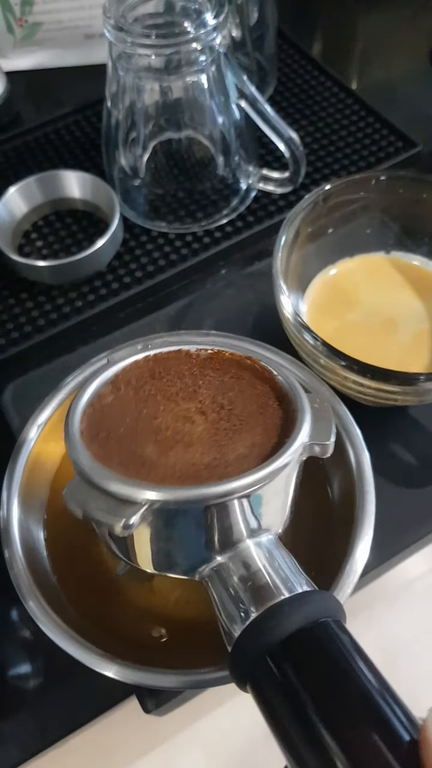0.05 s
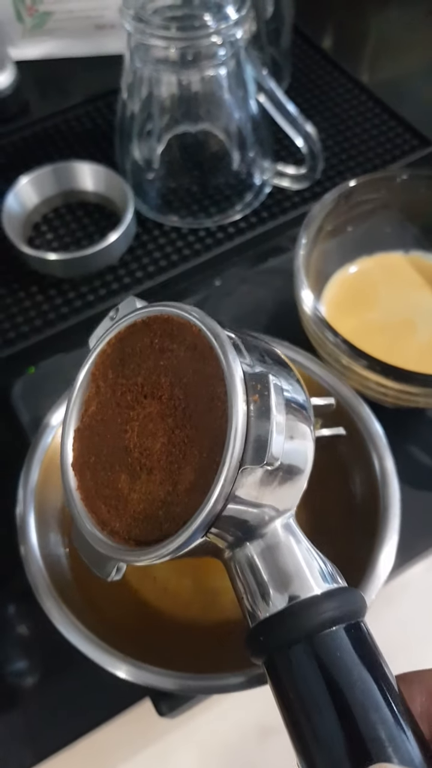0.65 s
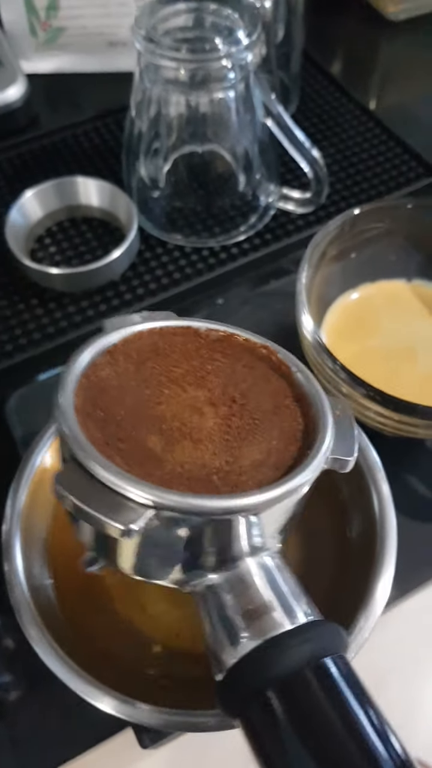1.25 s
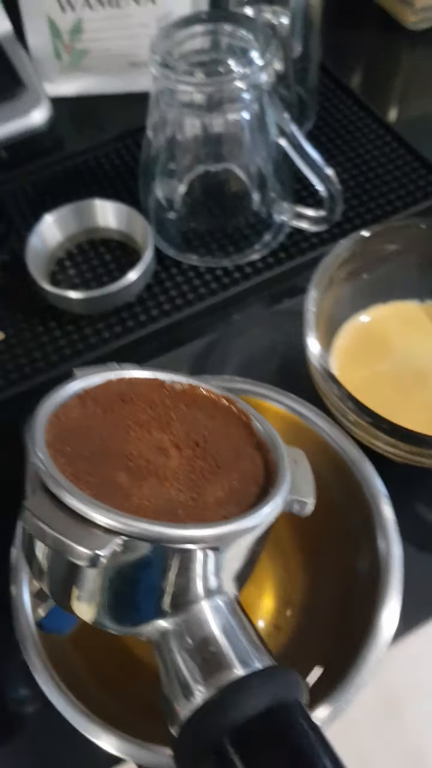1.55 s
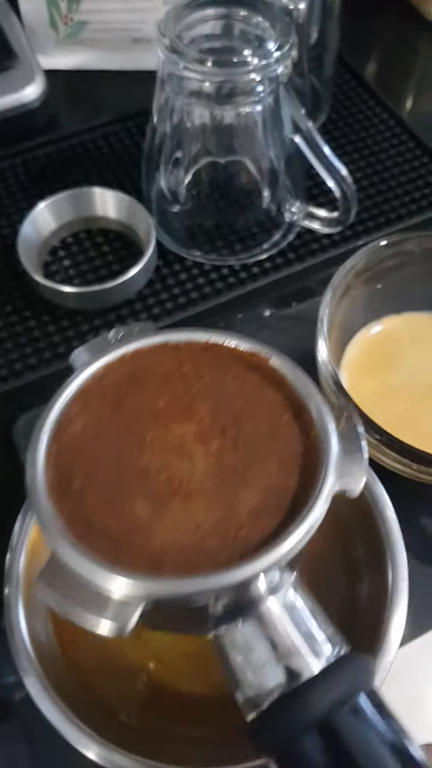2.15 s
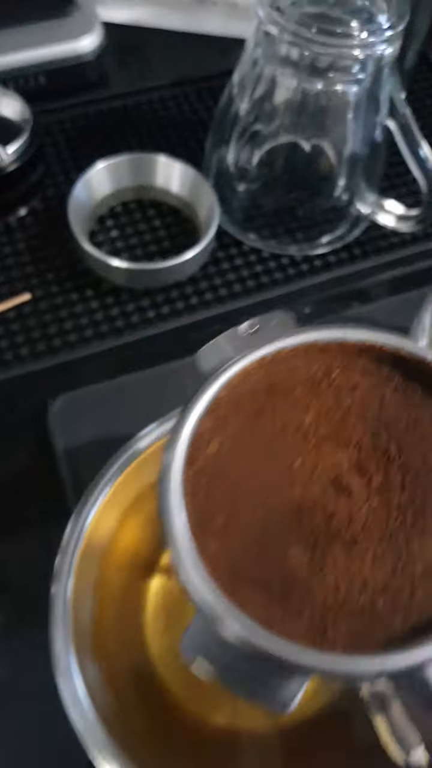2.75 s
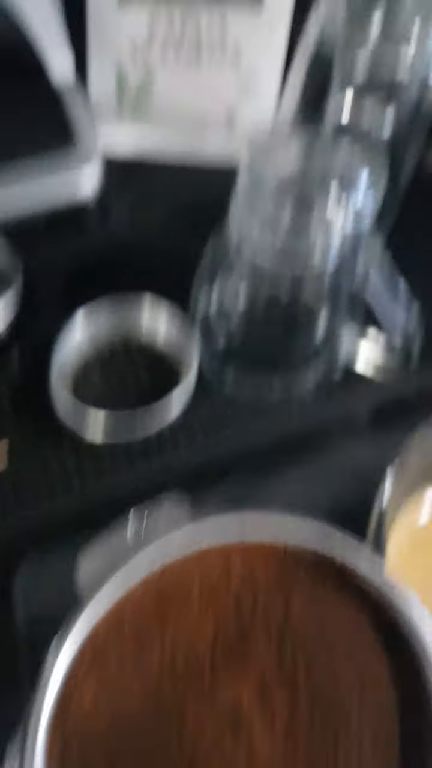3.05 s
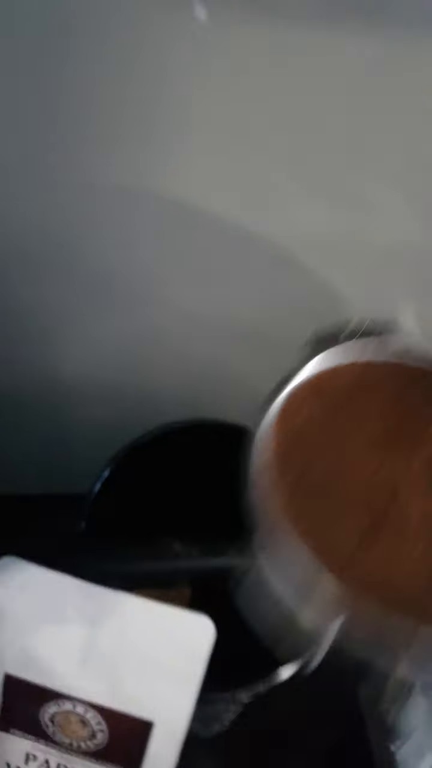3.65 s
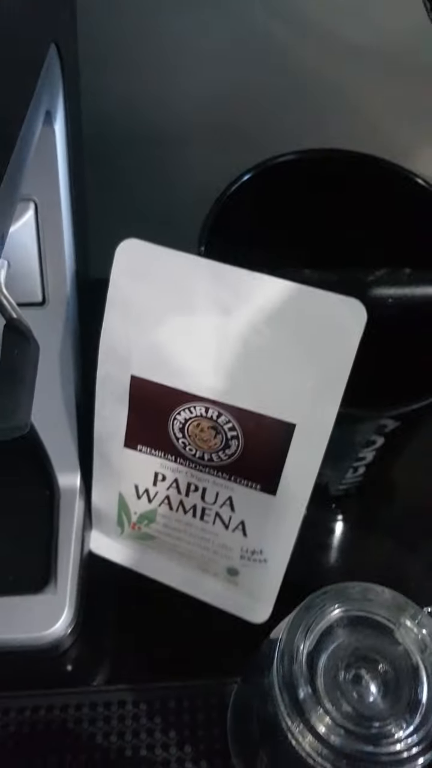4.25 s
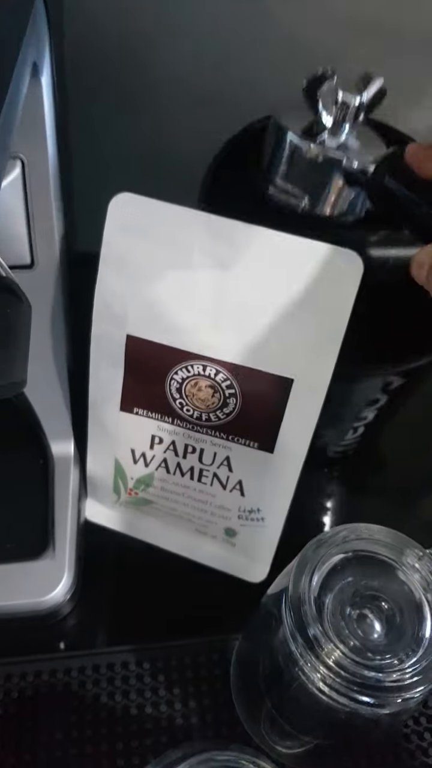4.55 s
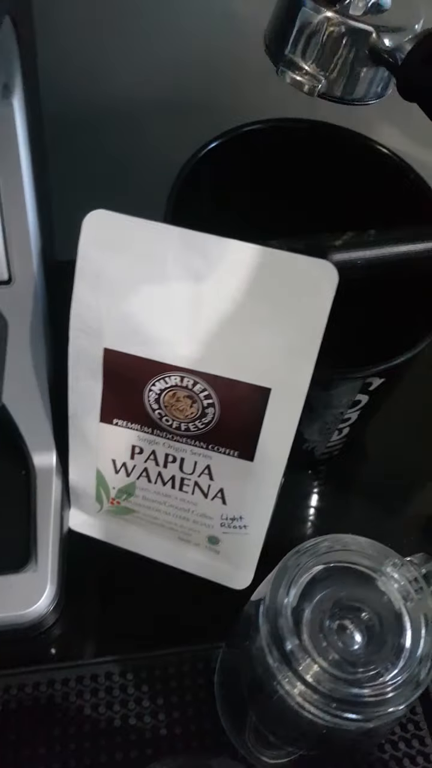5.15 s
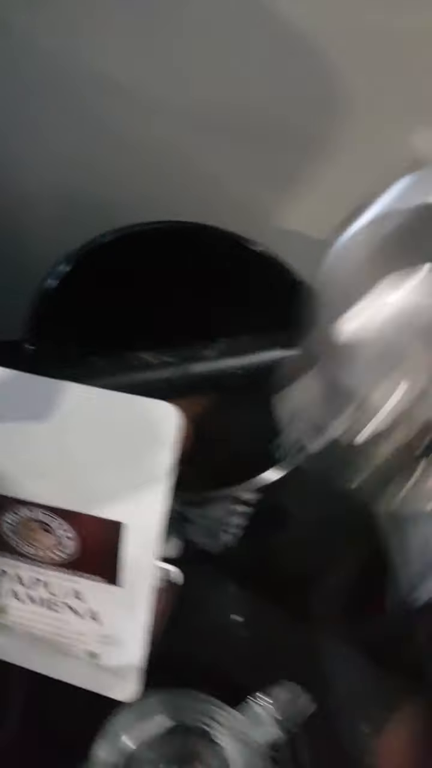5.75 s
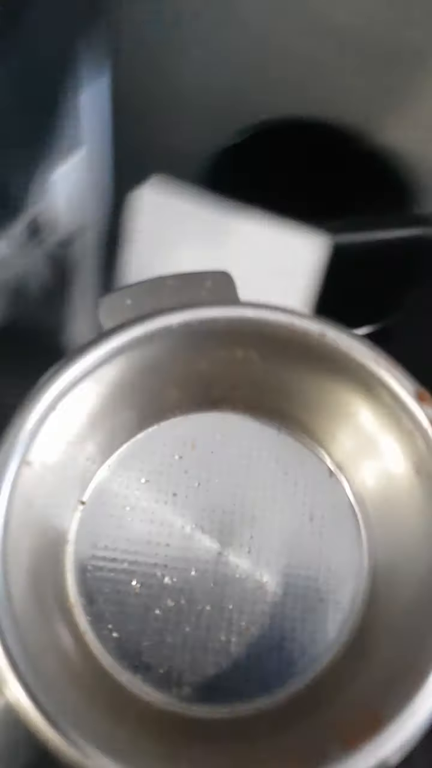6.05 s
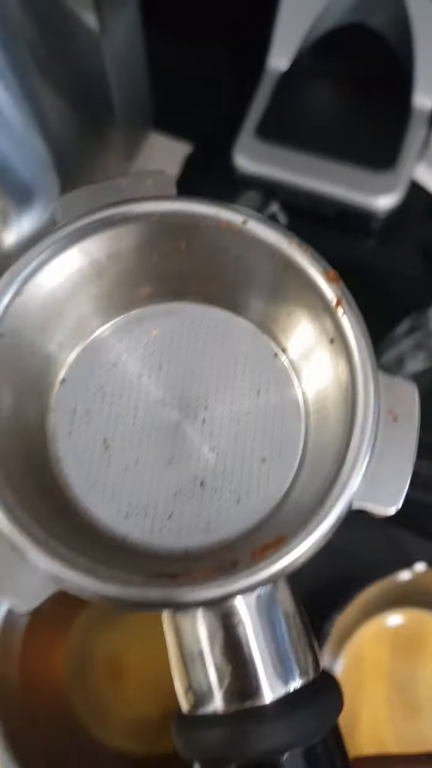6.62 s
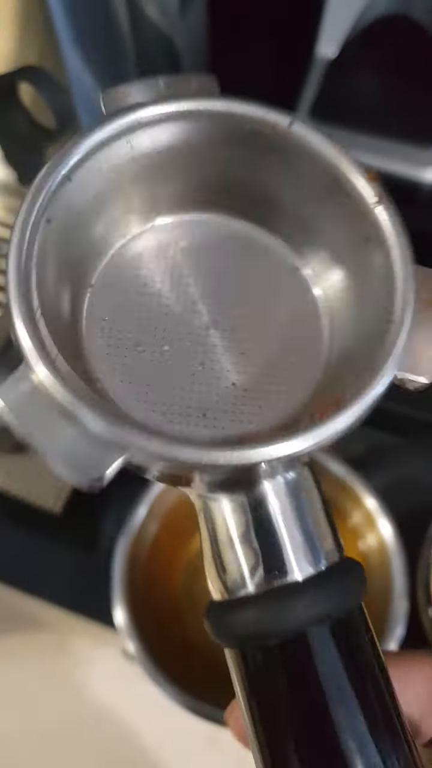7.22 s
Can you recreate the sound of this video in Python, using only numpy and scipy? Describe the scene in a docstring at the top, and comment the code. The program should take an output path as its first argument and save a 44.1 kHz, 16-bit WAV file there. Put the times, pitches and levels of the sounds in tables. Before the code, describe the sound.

A steel coffee filter holder is knocked three times on a plastic tub with deep booms, amid sleeve rustling and light handling taps.

```python
"""A steel coffee filter holder is knocked three times on the padded bar of a plastic tub.
Each blow cracks, rings the tub, booms through the counter, rattles loose things and spills grounds.
Around the blows, as the holder is carried across a small kitchen, a sleeve rustles and the hand
bumps and taps. Behind it all a fridge hums, and a faint whirr fades before the first blow."""
import sys
import numpy as np
from scipy import signal
from scipy.fft import rfft, irfft, next_fast_len
from scipy.io import wavfile
from scipy.ndimage import uniform_filter1d, minimum_filter1d, map_coordinates

SR = 44100
rng = np.random.default_rng(int(sys.argv[2]) if len(sys.argv) > 2 else 0)


def to_wav(s):
    """Save 16-bit WAV."""
    ch = np.atleast_2d(s).T  # columns
    pcm = np.round(np.clip(ch, -1, 1) * 32767)  # PCM
    wavfile.write(sys.argv[1], SR, pcm.astype(np.int16))


N = 325458

# blows on the bar: (time [s], boom [dB], tub ring [dB], crack [dB], rattle [dB], grounds [dB])
BLOWS = [(4.4635, -0.5, -22.5, -16, -25.5, -31), (5.0130, -3, -27.5, -29, -29.5, -38),
         (5.3156, -2.5, -23.5, -20, -27.5, -34.5)]
# A mode is a tone a thing rings at; its ring time is how long it takes to fall by 60 dB.
# the counter's modes: (pitch [Hz], level [dB], ring time [s], rise time [s])
COUNTER_MODES = [(88.6, -.7, .2, .0035), (107.8, -3.5, .27, .0003), (275, -13, .06, .0003),
                 (62, -19, .3, .004), (97, -29, 1.2, .02), (111, -28.5, 1.2, .02), (46, -22, .4, .01)]
# modes of the tub and of the steel holder: (pitch [Hz], level [dB], ring time [s])
TUB_MODES = [(146.7, -1, 0.12), (229.3, 3.5, 0.16), (288, 0, 0.14), (328.2, 3.5, 0.17), (420, -19, 0.07),
             (532, -5, 0.12), (572.6, -3.5, 0.22), (610, -3, 0.16), (670, -7, 0.21), (790, -34, .14)]
STEEL_MODES = [(950, -7.5, 0.1), (1063, -5, 0.086), (1337, -8, 0.052), (1468, 0.5, 0.042),
               (1580, -3.5, 0.041), (1697, -1, 0.075), (1855, -6.5, 0.048), (2070, -9, 0.13),
               (2283, -10, 0.11), (2640, -14.5, 0.14), (2610, -17, 0.14), (3260, -11, 0.085),
               (3400, -8, 0.1), (3370, -9, 0.12), (3940, -21, 0.1), (4150, -22, 0.12)]
# loose things landing: (time after the blow [s], level [dB])
LANDINGS = [(.011, -2), (.025, 0), (.035, 0.5), (.042, -2)]
# small bumps: (time [s], click [dB], click brightness [dB per octave], thud [dB], thud pitch [Hz])
TAPS = [(0.6508, -34, -0.5, -40, 333), (1.3244, -26.5, -1.5, -14, 416), (1.342, -32, -1, -27, 317),
        (1.351, -37, -1.5, -14, 100), (1.682, -38, 1.5, -34, 420), (2.276, -43, 0, -23.5, 400),
        (2.329, -40, 0, -23, 374.8), (2.489, -29.5, -3, -16.5, 317), (2.517, -39, 4, -13.5, 294),
        (2.549, -57, -3, -15.5, 302), (2.6234, -25.5, 1, 0, 300), (2.668, -34, -0.5, -17, 298),
        (2.864, -54, 0, -14.5, 298.6), (2.891, -51, -4, -11.5, 294), (2.973, -61, 0, -16.5, 300),
        (3.105, -59, 3, -12, 292), (3.128, -42, -3, -36, 300), (4.764, -39, -7, -32, 300),
        (6.345, -40, -2, -35, 398), (6.441, -46, 4, -29, 296), (6.46, -47, -4, -33, 457),
        (7.298, -48.5, 0.5, -34, 298)]
# sleeve strokes: (start [s], speeding up [s], slowing down [s], light brushing [dB], firm rubbing [dB])
SLEEVE_STROKES = [(.08, .24, 0.3, -68, -71), (0.467, 0.02, .12, -47.5, -61),
                  (.561, 0.072, 0.3, -54.5, -59.5), (.849, 0.013, 0.37, -61, -74),
                  (1.077, 0.042, 0.18, -42.5, -54.5), (1.27, 0.06, 0.21, -51, -51.5),
                  (1.406, 0.21, .52, -50.5, -55), (1.92, 0.14, 0.41, -50, -50),
                  (2.096, .18, 0.091, -43, -44), (2.319, 0.0081, 0.5, -48, -50.5),
                  (2.458, 0.063, .26, -39.5, -46), (2.571, 0.057, 0.21, -45.5, -46),
                  (2.696, 0.17, 0.89, -47.5, -48.5), (2.945, 0.12, 0.1, -33, -44.5),
                  (3.036, 0.095, .27, -38, -43), (3.361, .008, 0.12, -49, -49.5),
                  (3.388, 0.05, 1, -45.5, -45), (3.664, .105, 0.37, -40.5, -42.5),
                  (4.031, 0.087, 0.22, -46.5, -46.5), (4.172, 0.19, 0.45, -37, -42.5),
                  (4.55, .078, 0.26, -41.5, -47), (4.942, .018, 0.4, -53, -56.5),
                  (5.055, 0.24, 0.98, -53.5, -53.5), (5.489, 0.1, 0.14, -66, -64),
                  (5.592, 0.24, 0.14, -51.5, -57.5), (5.92, 0.1, .22, -50, -60.5),
                  (6.07, 0.043, 0.25, -47, -50.5), (6.25, 0.094, .12, -61, -64),
                  (6.432, 0.0069, .12, -47, -55), (6.52, 0.08, .15, -54, -58),
                  (6.7, 0.24, 0.14, -51.5, -54.5), (7.21, 0.093, 0.41, -57.5, -57)]
# fingers sliding, and the arm's one swing: (start [s], speeding up [s], slowing down [s], level [dB])
FINGER_SLIDES = [(1.5, 0.15, 0.24, -46), (2.15, .18, 0.087, -38), (2.495, 0.019, 0.21, -46.5),
                 (3.07, 0.052, .04, -41.5), (3.6, 0.17, 0.95, -48.5), (6.1, 0.027, 0.18, -59),
                 (6.8, 0.14, 0.1, -58)]
ARM_SWING = (3, .5, 1.6, -44)
# loudness of the shifting grip and of the whirr: (time [s], level [dB])
GRIP_LEVELS = [(0, -45.5), (1, -46), (2.2, -40), (3.2, -42.5), (4.45, -44.5), (4.9, -58.5), (5.3, -50),
               (6.2, -67), (7.38, -62)]
WHIRR_LEVELS = [(0, -56.5), (.8, -64), (2, -51), (2.6, -64), (3.3, -59), (4, -97)]

# the tone colour of each noise: (frequency [Hz], relative level [dB])
CRACK_COLOUR = [(300, 4.5), (700, 12.5), (1100, -13), (2500, -15), (4500, -6), (6500, -9.5), (8500, -15),
                (15000, -19)]
TUB_COLOUR = [(120, -32), (190, -28), (260, -2), (480, -1), (680, -21), (1500, -55)]  # the tub's crowd of short-lived modes
RATTLE_COLOUR = [(300, 5), (700, -9), (1100, 1), (1750, -2), (2300, -9.5), (3600, -6.5), (5000, -16),
                 (8500, -40), (15000, -17)]
CLICK_COLOUR = [(200, -3), (450, 7.5), (900, 1), (1900, -2.5), (3500, -7.5), (6000, -10), (8500, -15.5),
                (15000, -24)]
BRUSH_COLOUR = [(2000, -16), (4000, -6), (5400, -4.5), (6200, -2), (7000, 1), (8300, -3.5), (11000, 0.5),
                (15500, -1.5)]
RUB_COLOUR = [(600, -17), (1500, 0), (2350, 1), (3400, 1.5), (4300, -0.5), (6700, -2), (8500, -17),
              (15000, -17)]
ZIP_COLOUR = [(4500, -30), (5600, -4), (6300, 1), (7100, -1), (7800, -9), (9000, -35)]
SCRAPE_COLOUR = [(1500, -29), (1860, -9), (2050, -10), (2350, -1), (2650, -8), (3200, -25), (4500, -22)]
RUMBLE_COLOUR = [(15, -51), (30, -5), (50, -4), (100, 7), (140, -1), (190, -6.5), (280, 0), (400, -3),
                 (520, -15), (1000, -40), (3000, -68)]
SCUFF_COLOUR = [(250, -0.5), (500, -1), (700, 5.5), (1000, 3.5), (1150, -1), (1350, 1), (1900, -3),
                (3000, -10), (8000, -57)]
SWING_COLOUR = [(60, -57), (125, -8), (165, 0), (215, -8), (300, -22), (900, -56)]
WHIRR_COLOUR = [(600, -40), (880, -22), (960, 4.5), (1060, -37), (1220, -8), (1315, 8.5), (1420, -31),
                (1640, -4), (2000, -30), (3000, -62)]
AIR_COLOUR = [(15, -50), (28, -31), (50, -5), (101, 2), (183, -13), (289, -8), (389, -12.5), (469, -18.5),
              (666, -17.5), (1410, -24.5), (2360, -28), (4620, -28.5), (7100, -30), (8350, -39.5),
              (11200, -34.5), (15500, -35.5)]

# how long the kitchen echoes: (frequency [Hz], ring time [s])
ROOM_RING_TIMES = [(100, 0.35), (500, 0.38), (2000, 0.4), (6000, 0.37), (15000, 0.17)]
# how alike left and right sound: (frequency [Hz], likeness [-1 to 1])
STEREO_LIKENESS = [(130, 0.97), (290, 0.87), (560, 0.53), (1400, -0.17), (3000, -0.0086), (15000, -0.042)]
# balance of the microphones: (frequency [Hz], left minus right [dB])
MIC_BALANCE = [(100, 2.15), (380, -1), (620, 1.5), (1300, 0.5), (2400, 3), (4400, -0.5), (8100, 2),
               (14000, 6)]

AGE = np.arange(SR * 3 // 5) / SR  # time since a contact [s]


def amp(db):
    """Turn decibels into a gain."""
    return 10 ** (np.asarray(db) / 20)


def at_frequency(points, hz):
    """Read between (frequency, value) points on a log scale."""
    frequencies, values = np.transpose(points)
    return np.interp(np.log(hz + 1), np.log(frequencies), values)


def over_time(points):
    """Join (time, value) points into one value per sample."""
    return np.interp(np.arange(N) / SR, *np.transpose(points))


def wobble(rate):
    """A smooth curve through `rate` random values a second."""
    values = rng.standard_normal(int(N * rate / SR) + 4)
    return map_coordinates(values, [np.arange(N) * rate / SR])


def filtered(x, response):
    """Scale each frequency in x by response(frequency)."""
    n = x.shape[-1]
    padded = next_fast_len(n + 8192)
    return irfft(rfft(x, padded) * response(np.fft.rfftfreq(padded, 1 / SR)), padded)[..., :n]


def stereo_angle(hz):
    """Half the phase angle between the two microphones."""
    return np.arccos(np.clip(at_frequency(STEREO_LIKENESS, hz), -1, 1)) / 2


def noise(colour, size=len(AGE)):
    """Stereo noise of average power 1: the sides are alike in the bass, unrelated in the treble."""
    def response(hz):
        angle = stereo_angle(hz)
        return amp(at_frequency(colour, hz)) * np.array([np.cos(angle), np.sin(angle)])
    mid, side = filtered(rng.standard_normal((2, size)), response)
    stereo = np.array([mid + side, mid - side])
    return stereo / np.sqrt(np.mean(stereo ** 2) + 1e-20)


def add(track, start, sound):
    """Mix a sound into the track at `start` seconds."""
    part = track[:, round(start * SR):][:, :sound.shape[-1]]
    part += sound[..., :part.shape[-1]]


def fade(ring_s):
    """Die away by 60 dB in ring_s seconds."""
    return np.exp(-np.log(1000) * AGE / ring_s)


def ring(modes, spread_db, detune):
    """A struck thing rings; each hit gives its modes a slightly different strength and pitch."""
    out = np.zeros((2, len(AGE)))
    for hz, db, ring_s in modes:
        strength, pitch, side, flip = rng.standard_normal(4)
        offset = np.sign(side) * stereo_angle(hz) * np.array([[1], [-1]])
        phase = 2 * np.pi * hz * (1 + detune * pitch) * AGE + offset
        out += amp(db + spread_db * strength) * np.sign(flip) * np.sin(phase) * fade(ring_s)
    return out


def sliding(strokes, slowing=1.3):
    """Loudness of sliding strokes: each speeds up evenly, then slows to a stop."""
    t = np.arange(N) / SR
    power = np.zeros(N)
    for start, rise, fall, db in strokes:
        attack = np.clip((t - start) / rise, 0, 1)
        release = np.clip(1 - (t - start - rise) / fall, 0, 1) ** slowing
        power += (amp(db) * attack * release) ** 2
    return np.sqrt(power)


def in_room(sound, echo_db):
    """Add the kitchen's echo, in which each frequency dies at its own speed."""
    hz, t, spectrum = signal.stft(noise([(1, 0)]), SR, nperseg=256)
    ring_s = at_frequency(ROOM_RING_TIMES, hz)[:, None]
    tail = signal.istft(spectrum * amp(-60 * t / ring_s), SR, nperseg=256)[1][:, :len(AGE)]
    tail *= 1 - fade(0.043)  # echoes build up as the walls are reached
    echo = signal.fftconvolve(np.atleast_2d(sound), tail / np.linalg.norm(tail[0]), axes=1)
    return sound + amp(echo_db) * echo[:, :len(AGE)]


def near_walls(sound, echo_db, longest_s=0.008, count=8):
    """Nearby surfaces send back quick copies that colour the sound differently on each side."""
    delays = (rng.uniform(0.0004, longest_s, (2, count)) * SR).astype(int)
    strengths = amp(echo_db) * rng.standard_normal((2, count)) / np.sqrt(count)
    paths = np.zeros((2, SR // 20))
    paths[:, 0] = 1  # the direct sound
    paths[np.arange(2)[:, None], delays] = strengths
    paths /= np.linalg.norm(paths, axis=1, keepdims=True)
    return signal.fftconvolve(sound, paths, axes=1)[:, :sound.shape[1]]


def fridge(hum_hz=103, hum_db=-54, air_db=-51.5):
    """A wavering low hum over the still air of the room."""
    hum = np.sin(2 * np.pi * hum_hz * np.arange(N) / SR + 0.44 * wobble(3.12))
    return amp(hum_db + 1.9 * wobble(10)) * hum + amp(air_db) * noise(AIR_COLOUR, N)


def whirr():
    """Narrow bands of noise flutter near the coffee machine, then fade away."""
    flutter_db = 3.5 * wobble(24)
    return amp(over_time(WHIRR_LEVELS) + flutter_db) * noise(WHIRR_COLOUR, N)


def hand(scuff_db=-8.5):
    """The shifting grip rumbles, the fingers scuff the handle and the arm's swing adds a hollow swell."""
    grip = amp(over_time(GRIP_LEVELS))
    lumps = amp(1.8 * wobble(25))
    rumble = grip * lumps * noise(RUMBLE_COLOUR, N)
    swing = sliding([ARM_SWING]) * noise(SWING_COLOUR, N)
    scuffing = np.hypot(grip * amp(scuff_db), sliding(FINGER_SLIDES))
    scuff = scuffing * amp(2.4 * wobble(30.06)) * noise(SCUFF_COLOUR, N)
    return rumble + swing + scuff


def sleeve(zip_db=-5, scrape_db=-6, reach_s=3.68):
    """Cloth fibres catch and slip, zipping on light strokes and sounding duller on firm ones."""
    brushing = sliding([(*timing, db) for *timing, db, _ in SLEEVE_STROKES])
    rubbing = sliding([(*timing, db) for *timing, _, db in SLEEVE_STROKES])
    lightness = brushing / (np.hypot(brushing, rubbing) + 1e-9)
    zipping = brushing * amp(zip_db) * lightness ** 9.9
    arm_out = over_time([(reach_s, 0), (reach_s + 0.073, 1)])
    scraping = rubbing * amp(scrape_db) * arm_out
    catching = amp(1.26 * wobble(45) + 0.88 * wobble(300))
    cloth = (brushing * noise(BRUSH_COLOUR, N) + rubbing * noise(RUB_COLOUR, N)
             + zipping * noise(ZIP_COLOUR, N) + scraping * noise(SCRAPE_COLOUR, N))
    return near_walls(catching * cloth, echo_db=-9)


def taps():
    """Light bumps make a soft thud, then a click; each click has its own brightness."""
    out = np.zeros((2, N))
    for start, click_db, brightness, thud_db, thud_hz in TAPS:
        colour = [(hz, db + brightness * np.log2(hz)) for hz, db in CLICK_COLOUR]
        click = noise(colour) * fade(0.069) * (1 - fade(0.005))
        click = near_walls(click, echo_db=-4.5)
        thud = np.sin(2 * np.pi * thud_hz * AGE) * fade(0.037) * (1 - fade(0.036)) ** 2
        add(out, start, amp(thud_db) * in_room(thud, echo_db=-11))
        add(out, start + 0.0015, amp(click_db) * in_room(click, echo_db=-7.5))
    return out


def grounds(delay_s=0.02):
    """Fine coffee shakes loose after each blow and sprays the tub with a soft hiss."""
    out = np.zeros((2, N))
    for start, *_, spill_db in BLOWS:
        hiss = noise(BRUSH_COLOUR) * (1 - fade(0.083)) * fade(0.26)
        add(out, start + delay_s, amp(spill_db) * hiss)
    return out


def rattles():
    """Loose things jump at every blow and clatter down in the same order."""
    out = np.zeros((2, N))
    for start, *_, rattle_db, _ in BLOWS:
        for delay, db in LANDINGS:
            clack = ring(STEEL_MODES, spread_db=2.5, detune=0.005) * fade(0.14)  # contact damps it
            chatter = noise(RATTLE_COLOUR) * fade(0.03) + amp(-6) * clack
            add(out, start + delay, amp(rattle_db + db) * in_room(chatter, echo_db=-7))
    return out


def counter_boom():
    """The counter's modes start in opposite directions, so the boom swells, dips and returns."""
    boom = np.zeros(len(AGE))
    for k, (hz, db, ring_s, rise_s) in enumerate(COUNTER_MODES):
        swell = 1 - np.exp(-AGE / rise_s)
        boom += (-1) ** k * amp(db) * np.sin(2 * np.pi * hz * AGE) * fade(ring_s) * swell
    return boom


def knocks(squeeze_s=0.0015):
    """Steel hits the bar: the counter booms and, once the rubber has squeezed, tub and steel ring."""
    out = np.zeros((2, N))
    boom = counter_boom()
    for start, boom_db, tub_db, crack_db, _, _ in BLOWS:
        add(out, start, amp(boom_db) * in_room(boom, echo_db=-26))
        tub = ring(TUB_MODES, spread_db=2.5, detune=0.0063)
        tub += amp(-3) * noise(TUB_COLOUR) * fade(0.13)
        add(out, start + squeeze_s, amp(tub_db) * in_room(tub, echo_db=-9.5))
        crack = noise(CRACK_COLOUR) * fade(0.022)
        crack += amp(-19.5) * ring(STEEL_MODES, spread_db=4, detune=0.0081)
        add(out, start + squeeze_s, amp(crack_db) * in_room(crack, echo_db=0))
    return out


def scene():
    """The blows, the handling and the background together."""
    return knocks() + rattles() + grounds() + taps() + sleeve() + hand() + whirr() + fridge()


def record(dry, low_cut_hz=33, top_hz=15800):
    """The left microphone is brighter; deep bass and top treble are cut and loud peaks turned down."""
    heard = filtered(dry, lambda hz: amp(at_frequency(MIC_BALANCE, hz) * np.array([[0.5], [-0.5]])))
    heard = signal.sosfilt(signal.butter(2, low_cut_hz, "high", fs=SR, output="sos"), heard)
    safe_gain = 1 / np.maximum(np.abs(heard).max(axis=0), 1)
    smooth_gain = uniform_filter1d(minimum_filter1d(safe_gain, size=601), size=301)
    return filtered(heard * smooth_gain, lambda hz: hz < top_hz)


dry = scene()
out = record(dry)
to_wav(out)
```